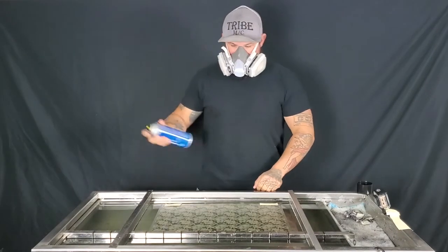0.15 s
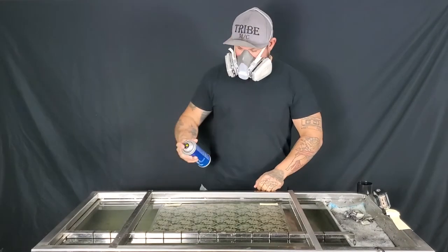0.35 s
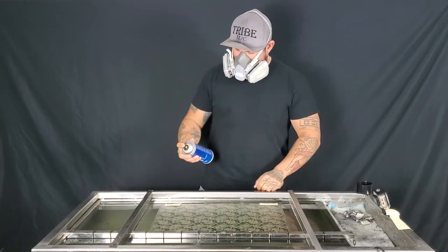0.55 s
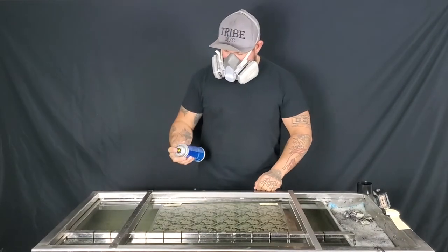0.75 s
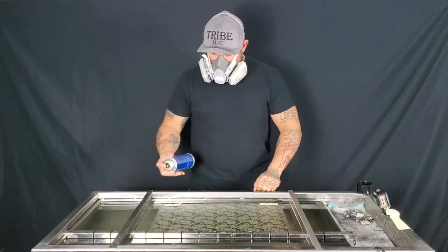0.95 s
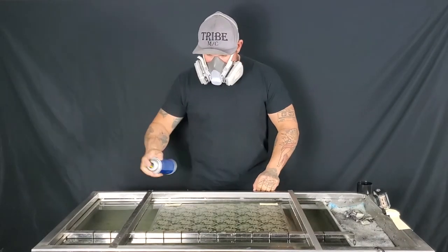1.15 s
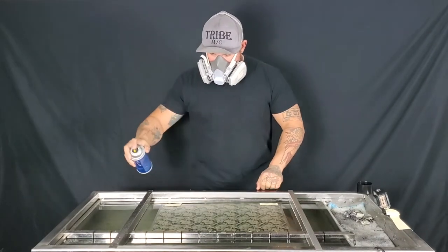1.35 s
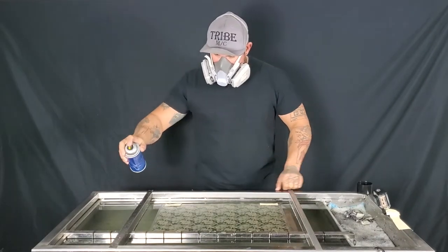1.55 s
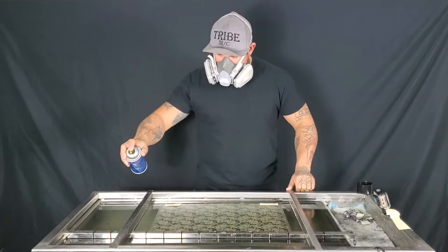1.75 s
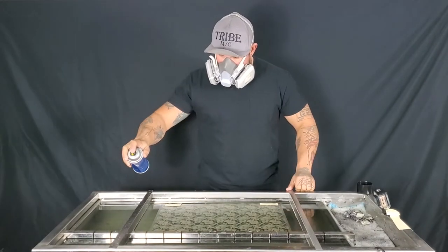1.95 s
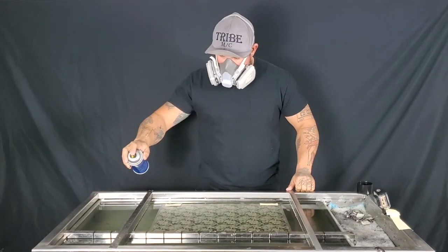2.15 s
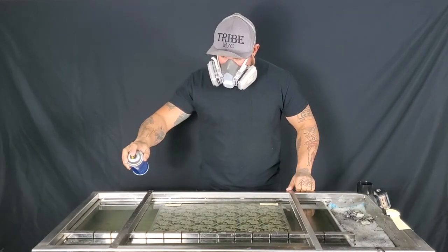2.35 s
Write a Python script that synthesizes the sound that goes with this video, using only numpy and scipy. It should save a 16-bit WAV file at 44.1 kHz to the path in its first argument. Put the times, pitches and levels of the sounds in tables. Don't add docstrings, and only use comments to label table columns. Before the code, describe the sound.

Close stereo microphone in a small indoor workshop: the ball in an aerosol can clatters and skitters, a dull thud as the can turns, faint liquid swishes, a quiet pause, and finally a sharp rising spray hiss.

```python
import sys
import numpy as np
from scipy import signal
from scipy.io import wavfile
from scipy.ndimage import uniform_filter1d

SR = 44100
rng = np.random.default_rng(int(sys.argv[2]) if len(sys.argv) > 2 else 0)


def ratio_of_db(decibels):
    return 10 ** (np.asarray(decibels, float) / 20)


def master(y):
    cut = np.clip(np.atleast_2d(y).T, -1, 1)
    pcm = np.round(cut * 32767)
    wavfile.write(sys.argv[1], SR, pcm.astype(np.int16))


N = 109456

# [f/Hz, level/dB per Hz]
RUMBLE_TONE = [(12, -57.5), (20, -37), (35, -18), (59, 2.5), (77, -3.5), (91, -15.5), (123, -13),
               (309, -26), (700, -44), (910, -63), (1540, -120)]
# [f/Hz, likeness 0-1]
RUMBLE_LIKENESS = [(60, 0.97), (125, 1), (250, 0.79), (500, 0.35), (1000, 0.089)]
# [f/Hz, level/dB per Hz]
HISS_TONE = [(410, -49), (700, -22), (815, -2), (1070, -14), (1520, -13.5), (1770, -11.5), (2600, -20.5),
             (11800, -30.5), (12300, -71)]
# [f/Hz, t60/s]
ROOM_DECAY = [(300, .45), (1000, 0.42), (3000, 0.64), (8000, 0.39), (15000, 0.33)]
# [t/s, level/dB]
FIZZ_LEVEL = [(0.0, -41.5), (0.0102, -51.5), (0.012, -30), (0.282, -52), (0.284, -40), (0.387, -55.5),
              (0.389, -33), (0.426, -39), (0.693, -68.5), (0.696, -45.5), (0.71, -51), (0.828, -55.5),
              (0.975, -69), (0.978, -57), (1.28, -67.5), (1.44, -78), (1.7, -82.5), (1.8, -110)]
# [f/Hz, level/dB per Hz]
FIZZ_TONE = [(290, -36.5), (500, -11), (1030, -9.5), (1690, -0.5), (2160, -5), (3650, -3), (8090, -11),
             (13800, -12), (16000, -13)]
# [f/Hz, width/Hz, lift/dB]
AIR_SPACE = [(1510, 140, -0.5), (2695, 440, 7), (3854, 460, 3.5), (4330, 1400, 2), (6530, 790, 3.5),
             (8780, 1000, -8), (9660, 500, 5), (14300, 1100, 0.5)]
# [t/s, peak level/dB, treble of the tick/dB, pitch of the spot struck f/Hz]
CLACKS = [(0.0105, -14.5, -8, 2860), (0.0147, -23, -16, 2890), (0.0199, -17, -9.5, 2930),
          (0.0245, -17, -13.5, 2890), (0.0388, -17, -13, 1780), (0.041, -20.5, -13, 1780),
          (0.0440, -18.5, -23, 1830), (0.0475, -22, -23.5, 1800), (0.0530, -21, -20.5, 2300),
          (0.0634, -25, -16.5, 1740), (0.0790, -16, -13.5, 2900), (0.0904, -13.5, -19, 1400),
          (0.1054, -33, -25, 2170), (0.1270, -25, -24, 1800), (0.1340, -19, -27.5, 1470),
          (0.1407, -18, -29, 2110), (0.1440, -26.5, -23, 1390), (0.1520, -23, -29, 1800),
          (0.1604, -25, -21, 1700), (0.181, -29, -25, 1510), (0.2121, -30, -11, 1860),
          (0.2293, -29, -9.5, 1870), (0.2830, -21.5, -16, 2780), (0.2852, -26, -20, 1900),
          (0.2887, -24, -12, 1810), (0.3100, -31, -29.5, 1800), (0.343, -28.5, -31, 1710),
          (0.3560, -34.5, -4.5, 2780), (0.3880, -18.5, -11.5, 2630), (0.3908, -25, -5.5, 3900),
          (0.3940, -27, -19, 1960), (0.4141, -25, -32, 3970), (0.4828, -29, -36.5, 2200),
          (0.5087, -37, -31, 2110), (0.5374, -31.5, -43, 2070), (0.5926, -35, -35, 2060),
          (0.6947, -36, -12, 1650), (0.7007, -41.5, -23, 1650), (0.7464, -41.5, -24, 1710),
          (0.7854, -39.5, -22, 1676), (0.977, -45.5, -11, 2770)]
# [f/Hz, level/dB, t60/s]
CAN_MODES = [(634, -20, 0.011), (1037, -21.5, 0.079), (1377, -9, 0.027), (1662, -5.5, 0.013),
             (1822, -2.5, 0.035), (2121, -4.5, 0.035), (2438, -4.5, 0.032), (2807, -6.5, 0.04),
             (3144, -11, 0.049), (3570, -9, 0.041), (3940, -5.5, .05), (4450, -4.5, .015),
             (6270, -6, 0.028)]
# [t/s, level/dB, brightness/dB per octave]
SKITTER_PATH = [
    (0.01, -43, -2),
    (0.012, -33, -3),
    (0.15, -34, -2),
    (0.224, -47, -7),
    (0.3875, -39.5, -1),
    (0.389, -44, -1.5),
    (0.656, -54, -3),
    (0.788, -53.5, -14.5),
    (0.97, -66.5, -9.5),
]
# [t/s, f/Hz, level/dB]
SING_HIGH = [
    (0.388, 4060, -41),
    (0.44, 3880, -40.5),
    (0.47, 3900, -50),
    (0.484, 3970, -48.5),
    (0.54, 3830, -68),
    (0.68, 4000, -79),
]
# [t/s, f/Hz, level/dB]
SING_LOW = [
    (0.46, 2100, -57),
    (0.482, 2110, -40.5),
    (0.528, 2050, -55),
    (0.536, 2010, -45),
    (0.668, 1960, -66.5),
    (0.694, 1850, -65),
    (0.772, 1740, -66),
    (0.788, 1750, -59.5),
    (0.92, 1810, -77),
]
# [f/Hz, level/dB, t60/s]
THUD_MODES = [(122, -8, 0.18), (196, -11, 0.17), (323, -14, 0.065), (475, 3, 0.042), (527, -10.5, 0.24),
              (704, -5.5, 0.044)]
# [start t/s, length/s, level/dB]
SWISHES = [
    (1.14, 0.11, -73.5),
    (1.29, 0.067, -65),
    (1.488, 0.088, -67),
    (1.575, 0.081, -68),
    (1.834, 0.051, -83.5),
]
# [f/Hz, level/dB per Hz]
SWISH_TONE = [(900, -28.5), (1450, -1.5), (2100, -8), (2750, -2.5), (3300, -8.5), (4200, 2), (8200, -15.5),
              (9700, -5), (10800, -14.5), (14000, -6.5)]
# [t/s, f/Hz, level/dB]
FAN_WHINE = [(1.2, 1920, -90), (1.3, 1920, -92.5), (1.45, 1900, -95.5), (1.72, 1950, -91), (2.0, 1900, -98),
             (2.05, 1880, -90.5), (2.48, 1830, -88)]
# [t/s, f/Hz, level/dB]
SQUEAK_PATH = [
    (1.75, 12500, -95.5),
    (1.8, 12300, -86),
    (1.838, 12430, -93),
    (1.904, 13770, -88),
    (1.942, 13800, -82),
    (1.994, 12440, -88.5),
    (2.09, 11660, -94),
    (2.116, 12500, -82),
    (2.18, 11700, -104),
]
# [f/Hz, level/dB per Hz]
SPRAY_TONE = [(240, -43), (400, -18), (467, -27), (979, -18), (1440, -17.5), (5350, -10), (10500, -7),
              (14100, -1), (16000, -2)]


def evened(x):
    return x / np.sqrt(np.mean(x ** 2) + 1e-20)


def flicker(samples):
    return evened(uniform_filter1d(rng.standard_normal(N), samples))


def read(points, hz):
    f, value = np.transpose(points)
    return np.interp(np.log(hz + 1), np.log(f + 1), value)


def curve(rows, col=1):
    return np.interp(np.arange(N) / SR, [r[0] for r in rows], [r[col] for r in rows])


def add(mix, s, sound):
    part = mix[max(round(s * SR), 0):][:len(sound)]
    part += sound[:len(part)]


def high(x, hz, order=2):
    return signal.sosfilt(signal.butter(order, hz, "high", fs=SR, output="sos"), x)


def noise(tone, same, patchy_db, size=1024):
    hz = np.fft.rfftfreq(size, 1 / SR)
    a, b, c, d, patches = rng.standard_normal((4 * N // size + 5, len(hz), 5)).T
    patches = evened(uniform_filter1d(uniform_filter1d(patches, 9, 0), 9, 1))
    likeness = np.clip(same(hz), -1, 1)[:, None]
    left = a + 1j * b
    right = likeness * left + np.sqrt(1 - likeness ** 2) * (c + 1j * d)
    z = np.array([left, right]) * ratio_of_db(read(tone, hz)[:, None] + patchy_db * patches)
    return evened(signal.istft(z, nperseg=size, noverlap=3 * size // 4)[1][:, :N])


def ring(hz, db, t60):
    t = np.arange(6000) / SR
    return ratio_of_db(db - 60 * t / t60) * np.sin(2 * np.pi * hz * t)


def room_tone():
    rumble = noise(RUMBLE_TONE, lambda hz: read(RUMBLE_LIKENESS, hz), patchy_db=1.5, size=4096)
    hiss = noise(HISS_TONE, lambda hz: 0.18 + 0 * hz, patchy_db=2.0)
    return ratio_of_db(-52.5) * rumble + ratio_of_db(-81) * hiss


def fizz():
    flicker_db = 1.4 * flicker(150)
    hz = np.geomspace(300, 17000, 400)
    lift_db = sum(db / (1 + (2 * (hz - f) / width) ** 2) for f, width, db in AIR_SPACE)
    tone = np.c_[hz, read(FIZZ_TONE, hz) + lift_db]
    hiss = noise(tone, lambda hz: 0.058 + 0 * hz, patchy_db=0, size=512)
    return hiss * ratio_of_db(curve(FIZZ_LEVEL) + 2.5 + flicker_db)


def clacks():
    tick_s, tick_db = 0.00027, 5.5
    ring_db, scatter_db, spot_db_per_oct = -5.5, 2, 16
    out, t = np.zeros(N), np.arange(400) / SR
    for s, db, treble_db, spot_hz in CLACKS:
        snap = (t == 0) + 0.83 * rng.standard_normal(400) * np.exp(-t / tick_s)
        tick = high(snap / np.linalg.norm(snap), 2500)
        add(out, s, ratio_of_db(db + treble_db + 14.5 + tick_db) * tick)
        wall = np.zeros(6000)
        for hz, mode_db, t60 in CAN_MODES:
            level_scatter, pitch_scatter = rng.standard_normal(2)
            away_db = spot_db_per_oct * abs(np.log2(hz / spot_hz))
            wall += ring(hz * (1 + 0.015 * pitch_scatter), mode_db + scatter_db * level_scatter - away_db, t60)
        add(out, s, ratio_of_db(db + ring_db) * wall)
    return out


def skitter():
    skips_per_s, spread_db = 900, 2
    size = ratio_of_db(spread_db * np.minimum(rng.exponential(1, N), 2)) * (rng.random(N) < skips_per_s / SR)
    modes = 3 * CAN_MODES
    which = rng.integers(0, len(modes), N)
    tilt_db = curve(SKITTER_PATH, col=2)
    out = np.zeros(N)
    for k, (hz, db, t60) in enumerate(modes):
        skips = size * (which == k) * ratio_of_db(tilt_db * np.log2(hz / 2000))
        out += signal.oaconvolve(skips, ring(hz * rng.uniform(0.92, 1.05), db, 0.59 * t60))[:N]
    rolling = np.arange(N) < SKITTER_PATH[-1][0] * SR
    return evened(out) * ratio_of_db(curve(SKITTER_PATH) - 6.5) * rolling


def singing(rows):
    width_hz = 220
    t, r = np.arange(N) / SR, np.exp(-np.pi * width_hz / SR)
    raw = rng.standard_normal(N) + 1j * rng.standard_normal(N)
    slow = signal.lfilter([1], [1, -2 * r, r * r], raw)
    carrier = np.exp(2j * np.pi * np.cumsum(curve(rows)) / SR)
    on = (t > rows[0][0]) & (t < rows[-1][0])
    return on * ratio_of_db(curve(rows, col=2) - 3) * evened((slow * carrier).real)


def thud():
    out, t = np.zeros(N), np.arange(6000) / SR
    band = signal.butter(2, [130, 850], "band", fs=SR, output="sos")
    puff = evened(signal.sosfilt(band, rng.standard_normal(6000))) * ratio_of_db(-8 - 60 * t / 0.2)
    knock = sum(ring(*mode) for mode in THUD_MODES) + puff
    soft_start = np.minimum(t / 0.0036, 1)
    add(out, 0.479, ratio_of_db(-32.5) * knock * soft_start)
    return out


def swishes():
    rise_s, fall_s = 0.016, 0.045
    t, level = np.arange(N) / SR, np.zeros(N)
    for s, length, db in SWISHES:
        rise = np.clip((t - s) / rise_s, 0, 1)
        fall = np.exp(-np.maximum(t - s - length, 0) / fall_s)
        level += ratio_of_db(db) * rise * fall
    return level * noise(SWISH_TONE, lambda hz: 0.072 + 0 * hz, patchy_db=2.5, size=512)


def fan():
    return singing(FAN_WHINE)


def squeak():
    t = np.arange(N) / SR
    on = (t > SQUEAK_PATH[0][0]) & (t < SQUEAK_PATH[-1][0])
    waver_db = 4 * flicker(500)
    jitter_hz = 900 * uniform_filter1d(rng.standard_normal(N), 60)
    phase = 2 * np.pi * np.cumsum(curve(SQUEAK_PATH) + 25 * waver_db + jitter_hz) / SR
    return np.sqrt(2) * on * ratio_of_db(curve(SQUEAK_PATH, col=2) - 0.5 + waver_db) * np.sin(phase)


def spray():
    start_s, rise_s, level_db, grow_db_per_s = 2.376, 0.013, -37.5, 43
    t = np.maximum(np.arange(N) / SR - start_s, 0)
    sputter_db = 1.9 * flicker(60)
    opening = 1 - np.exp(-(t / rise_s) ** 2)
    level = opening * ratio_of_db(level_db + grow_db_per_s * t + sputter_db)
    return noise(SPRAY_TONE, lambda hz: 0.046 + 0 * hz, patchy_db=0.9, size=256) * level


def room(x, wet_db):
    taps = np.zeros((2, SR))
    at = np.arange(100, SR - 20, 20) + rng.integers(0, 20, (2, (SR - 101) // 20))
    np.put_along_axis(taps, at, rng.choice([-1., 1.], at.shape), 1)
    hz, t, z = signal.stft(taps, SR, nperseg=256)
    tail = signal.istft(z * ratio_of_db(-60 * t / read(ROOM_DECAY, hz)[:, None]), SR, nperseg=256)[1]
    return ratio_of_db(wet_db) * signal.fftconvolve(x[None], tail / np.linalg.norm(tail[0]), axes=1)[:, :N]


def scene():
    pan = np.array([[0.5], [-0.5]])
    background = room_tone()
    paint = fizz()
    can = high(clacks(), 600) + skitter() + singing(SING_HIGH) + singing(SING_LOW)
    knock = thud()
    late_right = np.r_[np.zeros(5), can][:N]
    direct = np.array([can, late_right])
    paint = paint + swishes()
    background = background + fan()
    near = (direct + squeak() + paint) * ratio_of_db(2 * pan) + spray() * ratio_of_db(2.5 * pan)
    near = near + high(near, 9000) * (ratio_of_db(4 * pan) - 1)
    reflections = room(can + high(knock, 280), wet_db=-3)
    return near + knock + reflections + background * ratio_of_db(-1.2 * pan)


def low_pass(x):
    return signal.sosfilt(signal.butter(12, 16960, fs=SR, output="sos"), x)


def record(dry):
    upper_edge = signal.firwin(511, 15800, window=("kaiser", 9), fs=SR)
    mix = signal.oaconvolve(high(dry, 18), upper_edge[None], "same")
    return low_pass(mix)


dry = scene()
out = record(dry)
master(out)
```